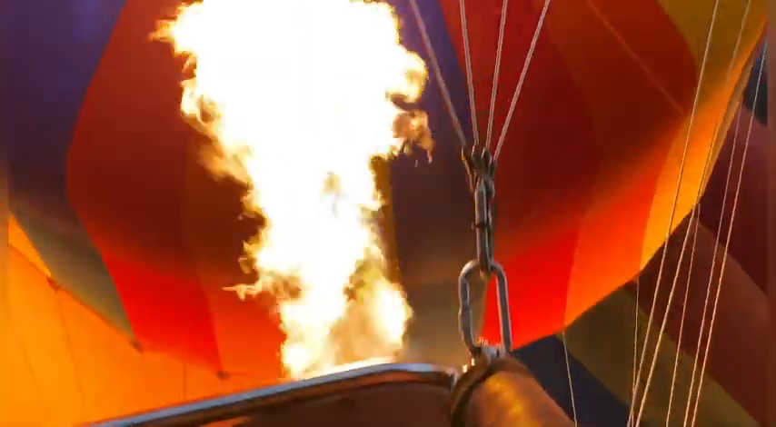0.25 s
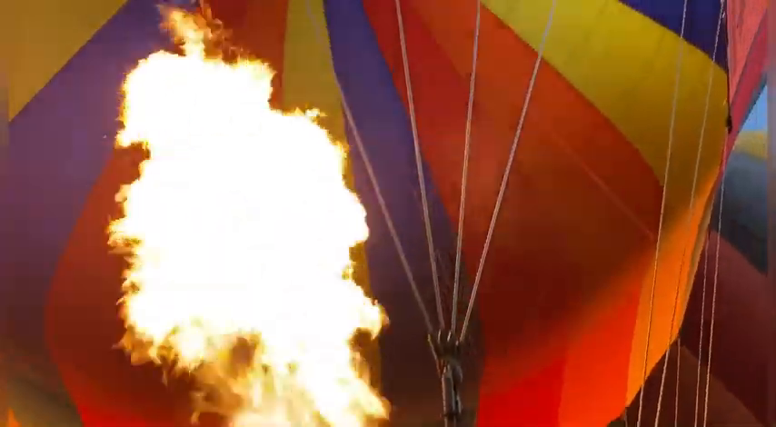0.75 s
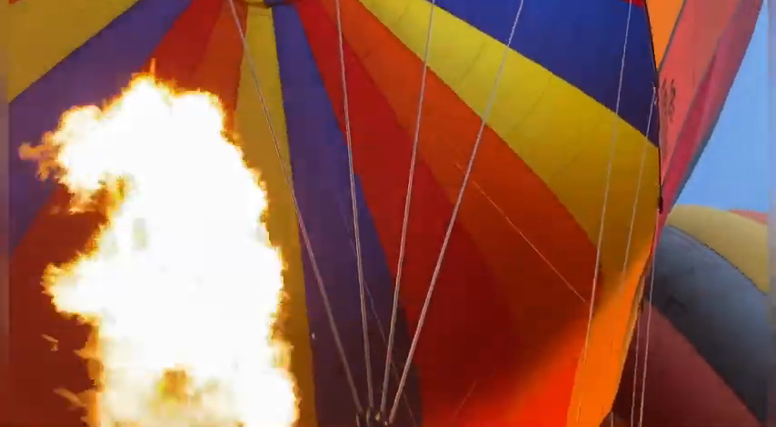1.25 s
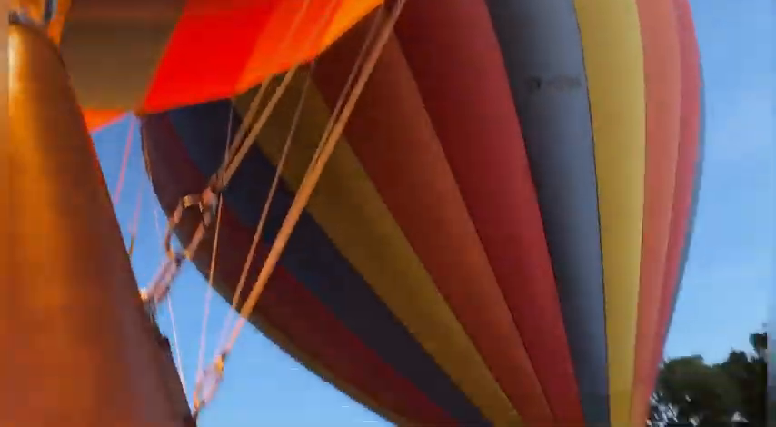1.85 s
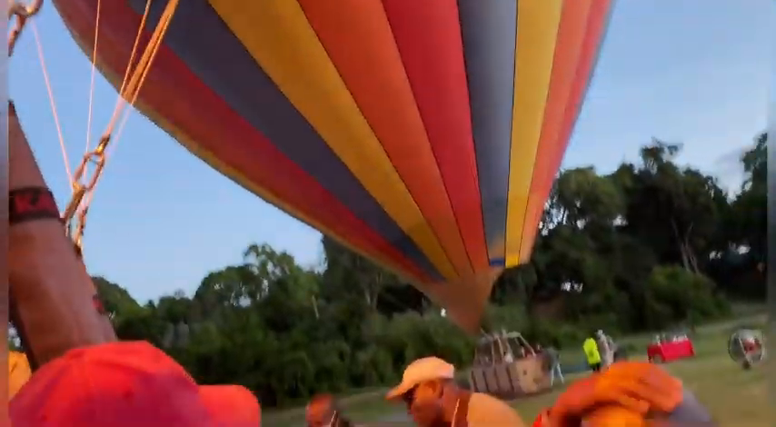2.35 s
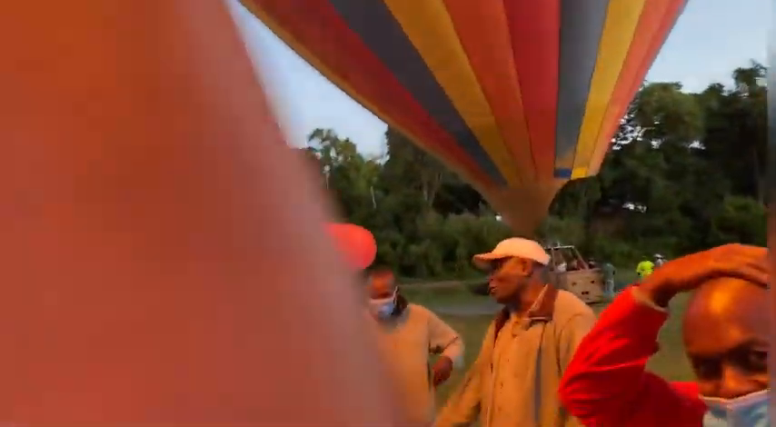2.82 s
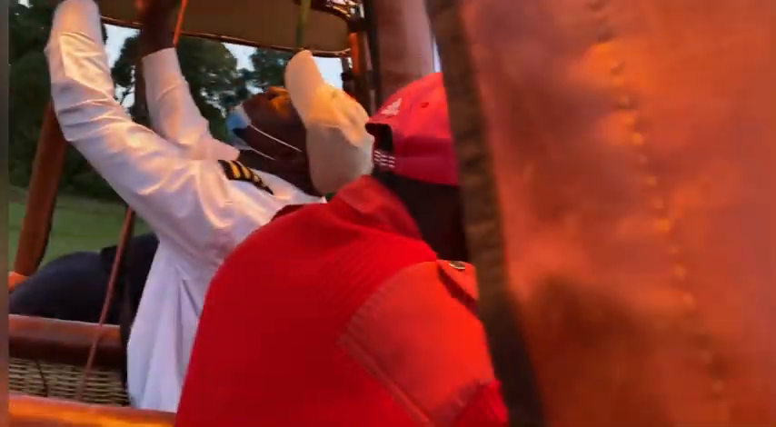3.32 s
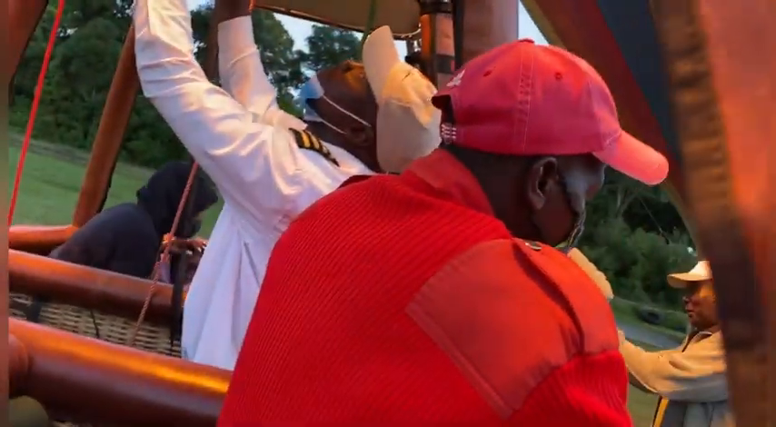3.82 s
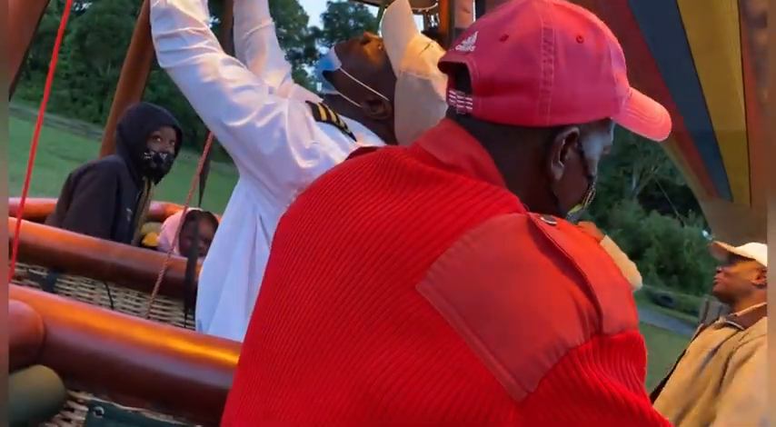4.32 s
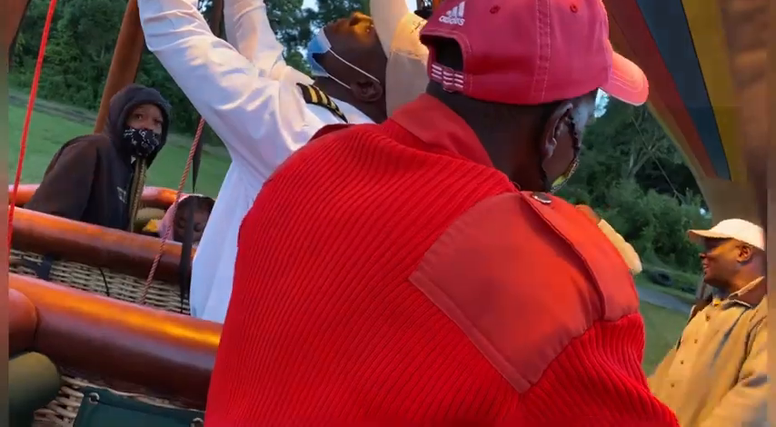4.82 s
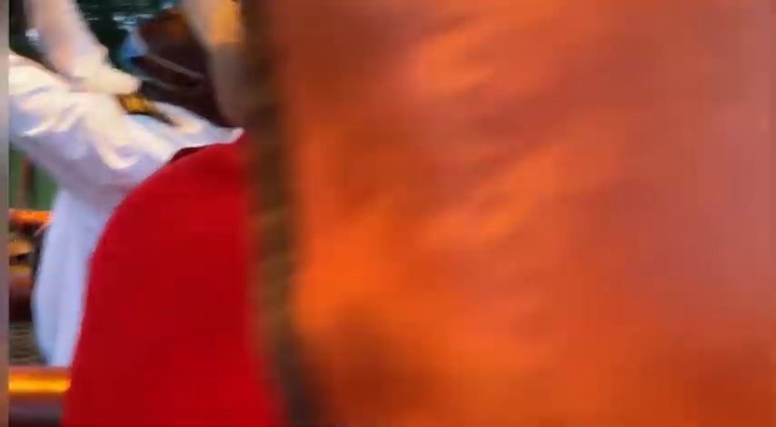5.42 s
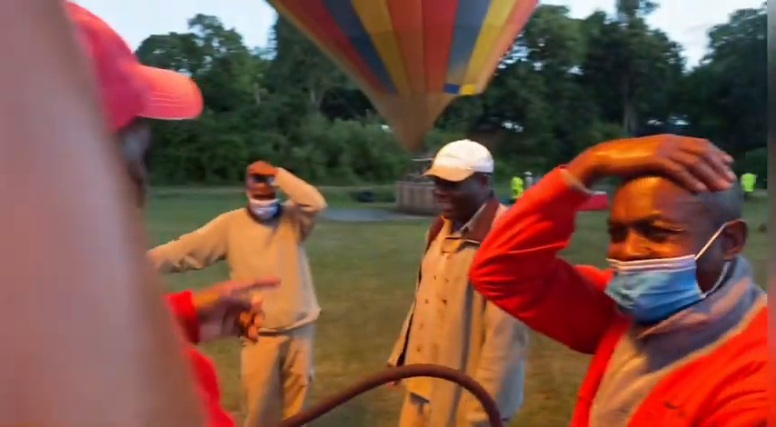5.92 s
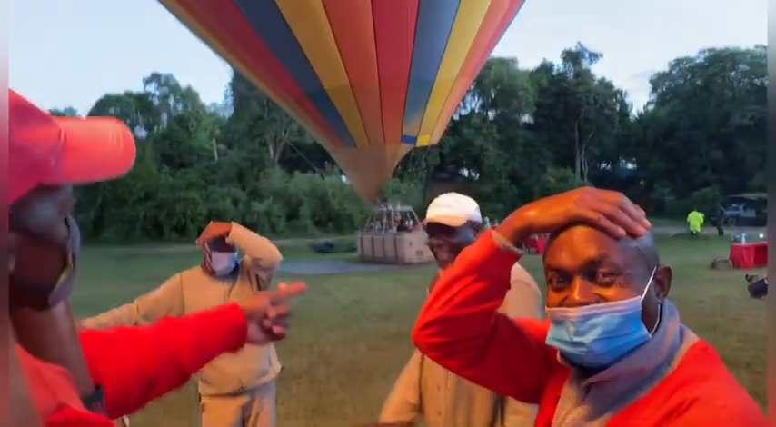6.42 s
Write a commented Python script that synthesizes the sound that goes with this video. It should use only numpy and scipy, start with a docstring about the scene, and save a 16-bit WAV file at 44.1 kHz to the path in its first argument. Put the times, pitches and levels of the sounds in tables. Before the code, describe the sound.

Unbroken, loud burner roar close by outdoors: fluttering low rumble, rushing mid-range flame and sputtering jet hiss that dulls and brightens with camera movement.

```python
"""Balloon burner overhead

A hot-air balloon's propane burner fires without a break: shaped noises make the flame's rumble and roar
and the hiss of the gas jets; short low pulses make the low swells of the rumble.
A hand-held camera looks up at the flame, drops to face the field, turns in to the basket and back out.
As it turns, the treble falls in and out of its shadow and a close echo sweeps notches through the roar."""
import sys
import numpy as np
from scipy import signal
from scipy.fft import rfft, irfft, next_fast_len
from scipy.io import wavfile
from scipy.ndimage import uniform_filter1d, map_coordinates

SR = 44100
rng = np.random.default_rng(int(sys.argv[2]) if len(sys.argv) > 2 else 0)


def inscribe(sig):
    """Save sig as 16-bit PCM at rate SR to the path in sys.argv[1].

    A 1-D sig is mono; a 2-D sig holds one channel per row.
    Samples are clipped to [-1, 1] before scaling.
    """
    pcm = np.round(np.clip(np.atleast_2d(sig).T, -1, 1) * 32767)
    wavfile.write(sys.argv[1], SR, pcm.astype(np.int16))


N = 293706

# short-time spectra: window and hop [samples], bin frequencies [Hz], frame times [s]
SIZE, HOP = 1024, 256
HZ = np.fft.rfftfreq(SIZE, 1 / SR)[:, None]
TIMES = np.arange(N // HOP + 2) * HOP / SR

# strength of the flame, before the trim of the rumble or the roar: (time [s], level [dB])
FLAME_LEVEL = [(0, -19), (1.1, -19), (2.0, -18.5), (2.6, -18.0), (3.45, -19.5), (3.75, -18.5), (4.2, -18.9),
               (5.3, -19.5), (5.9, -19.5), (6.66, -20)]


def amp(db):
    """Level: twenty decibels are a factor of ten in amplitude."""
    return 10 ** (np.asarray(db) / 20)


def unit(x):
    """Normalization: equal mean power, with rms 1."""
    return x / np.sqrt(np.mean(x ** 2) + 1e-20)


def along(points, hz=HZ):
    """Logarithmic frequency scale: interpolates (frequency [Hz], value) points on it."""
    f, v = np.transpose(points)
    return np.interp(np.log(hz + 1), np.log(f + 1), v)


def curves(rows, times):
    """Linear interpolation in time of each column after the first."""
    s, *columns = np.transpose(rows)
    return [np.interp(times, s, column) for column in columns]


def wobble(rate, times):
    """Random modulation: a smooth curve through normal random knots, rate of them a second."""
    knots = rng.standard_normal(int(times[-1] * rate) + 4)
    return map_coordinates(knots, [times * rate])


def filtered(x, response):
    """Linear filtering: the spectrum of x times a response of frequency."""
    m = next_fast_len(N + SR // 4)
    spectrum = rfft(x, m) * response(np.fft.rfftfreq(m, 1 / SR))
    return irfft(spectrum, m)[..., :N]


def moving(x, response):
    """Time-varying filtering: short-time spectra times a response over HZ and TIMES."""
    frames = signal.stft(x, nperseg=SIZE, noverlap=SIZE - HOP)[2]
    return signal.istft(frames * response, nperseg=SIZE, noverlap=SIZE - HOP)[1][:, :N]


def noise(spectrum, channels):
    """Turbulent sound as independent random noises of one spectrum and rms 1."""
    white = rng.standard_normal((channels, N))
    return unit(filtered(white, lambda hz: amp(along(spectrum, hz))))


def at_ports(spectrum):
    """Coherence: one noise in phase at both ports and one in opposite phase set their likeness."""
    # (frequency [Hz], left-right likeness [0-1])
    coherence = [(60, .97), (450, .98)]

    def angle(hz):
        return np.arccos(np.clip(along(coherence, hz), 0, 1)) / 2

    shared, opposed = noise(spectrum, channels=2)
    mid = filtered(shared, lambda hz: np.cos(angle(hz)))
    side = filtered(opposed, lambda hz: np.sin(angle(hz)))
    return np.array([mid + side, mid - side])


def panned(left_db):
    """Interaural level difference: gains of the two ports that are left_db apart."""
    return np.array([amp(left_db / 2), amp(-left_db / 2)])


def swing(middle_s, length_s):
    """Smooth motion: a half sine eases a hand movement from 0 to 1 over TIMES."""
    return .5 + .5 * np.sin(np.pi * np.clip((TIMES - middle_s) / length_s, -.5, .5))


def camera(flame_db=5, basket_db=7):
    """Acoustic shadow: facing (lowered, inward [0-1]) sets how far the jets stand out of it [dB]."""
    # swings round: (time of mid-swing [s], length [s], turn [+1 into the basket, -1 back out])
    turns = [(3.0, 0.96, 1), (5.48, 0.77, -1)]
    lowered = swing(1.61, 0.98)
    inward = sum(np.sign(turn) * swing(s, length) for s, length, turn in turns)
    # the jets slip into the shadow more gradually than the camera drops
    shaded = swing(1.45, 2.1)
    exposed_db = flame_db * (1 - shaded) + basket_db * inward
    return lowered, inward, exposed_db


def frame_echoes(position, strength, count=10, typical_ms=1.9, swing_ms=.45, above_hz=2400):
    """Scattering: frame and rigging echo short waves, with delays that slide as the camera turns and sways."""
    position = position + .5 * wobble(3.5, TIMES)  # the hand's unsteadiness
    total = np.zeros((2, len(HZ), len(TIMES)), complex)
    for k, (distance, direction) in enumerate(rng.uniform(-0.997, 1, (count, 2))):
        slide_ms = swing_ms * np.sin(np.pi / 2 * direction) * position
        delay_ms = typical_ms * (1 + distance / 2) + slide_ms
        total[k % 2] += np.exp(-2j * np.pi * HZ * delay_ms / 1000)
    short_waves = HZ ** 2 / (HZ ** 2 + above_hz ** 2)
    return strength * total * short_waves


def rumble(steady_s=.14, trim_db=-0.48, left_db=1.64, billow_db=0.75, billow_rate=16, deep_hz=70):
    """Turbulent combustion: large eddies, kept even in power by the steady gas feed, billow quickly."""
    # relative spectrum: (frequency [Hz], density [dB per Hz])
    eddy_spectrum = [(18, -38), (30, -35), (42, -8.5), (60, -2), (80, -0.5), (115, -2), (160, -6),
                     (210, -5.5), (280, -13), (450, -24), (900, -84)]
    # gain of the deepest rumble: (time [s], gain [dB])
    deep_gain = [(0, 1.5), (1.1, -2.5), (1.8, -4), (2.5, -3), (3.3, -1.5), (4.2, 1), (5, 1.8), (5.45, 3.5),
                 (6.2, -0.5)]
    t = np.arange(N) / SR
    eddies = at_ports(eddy_spectrum)
    power = np.abs(uniform_filter1d(np.mean(eddies ** 2, axis=0), int(steady_s * SR)))
    flame_db, = curves(FLAME_LEVEL, t)
    deep_db, = curves(deep_gain, t)
    level = amp(flame_db + trim_db + billow_db * wobble(billow_rate, t))
    even = eddies / np.sqrt(power + 1e-6) * level * panned(left_db)[:, None]
    deep = filtered(even, lambda hz: 1 / (1 + (hz / deep_hz) ** 6))
    return even + (amp(deep_db) - 1) * deep


def patches(rms_db=1.05, width_hz=350, length_s=.1):
    """Turbulent colour: random patches of gain [dB] over HZ and TIMES."""
    field = rng.standard_normal((len(HZ), len(TIMES)))
    field = uniform_filter1d(field, int(width_hz * SIZE / SR), axis=0)
    field = uniform_filter1d(field, int(length_s * SR / HOP), axis=1)
    return rms_db * unit(field)


def roar(flicker_db=0.5, flicker_rate=20, trim_db=-5.0, likeness_power=.75):
    """Interference: the small eddies' noise meets its echoes off close surfaces as the camera turns."""
    # relative spectrum: (frequency [Hz], density [dB per Hz])
    eddy_spectrum = [(130, -7.5), (350, 1), (520, -3), (700, -6), (950, -6), (1400, -14), (1900, -17.5),
                     (2600, -20), (3300, -18.5), (4200, -20), (5200, -21), (6200, -23.5), (6900, -32),
                     (9000, -90)]
    # the ports by facing, likeness before likeness_power:
    # (frequency [Hz], left gain [dB], right gain [dB], left lead [cycles], likeness [0-1])
    facing_flame = [(350.0, 0.7, -0.4, 0.05, 0.96), (750.0, 4.0, 1.7, 0.01, 0.85),
                    (950.0, 0.2, -2.6, 0.07, 0.88), (1150.0, 2.0, -3.0, 0.04, 0.75),
                    (1450.0, 4.8, 2.8, 0.03, 0.75), (1950.0, 5.3, 7.2, 0.01, 0.72),
                    (2600.0, 4.6, 5.2, 0.1, 0.55), (3600.0, 1.6, 0.7, 0.22, 0.42),
                    (3900.0, 3.9, 2.4, 0.41, 0.12), (5200.0, 5.2, 1.7, 0.88, 0.4),
                    (5800.0, 3.2, 0.0, 0.94, 0.37), (6150.0, 4.9, 2.7, 1.05, 0.4)]
    facing_field = [(350, 1.3, -1.0, 0.13, 0.95), (420, 2.6, 0.2, 0.17, 0.92), (500, 3.2, -0.2, 0.23, 0.92),
                    (620, 2.6, -4.8, 0.17, 0.7), (720, 4.0, -2.8, 0.18, 0.8), (820, 2.6, -2.5, 0.25, 0.9),
                    (930, 0.4, -3.0, 0.33, 0.84), (1070, -0.2, -2.5, 0.45, 0.75),
                    (1160, -0.6, -4.2, 0.5, 0.63), (1330, 1.8, -1.2, 0.33, 0.62),
                    (1500, 1.8, 0.4, 0.38, 0.66), (1680, 3.3, 3.6, 0.48, 0.84),
                    (1830, 1.2, 3.4, 0.56, 0.75), (2020, 2.2, 2.4, 0.91, 0.7), (2250, 4.6, 3.7, 1.06, 0.6),
                    (2480, 3.5, 2.8, 1.25, 0.35), (2660, 2.8, 2.2, 1.55, 0.12), (2850, 1.8, 1.4, 1.9, 0.45),
                    (3050, 0.6, -0.3, 2.03, 0.53), (3450, -0.4, -1.2, 1.97, 0.6),
                    (3800, 1.2, 1.0, 1.89, 0.4), (4650, 0.4, 0.2, 2.29, 0.1), (4800, 1.8, 1.2, 2.25, 0.22),
                    (5550, 0.8, 1.3, 2.73, 0.19), (5850, 2.5, 2.5, 2.95, 0.45)]
    facing_basket = [(350, 0.2, -0.2, 0.02, 0.98), (520, 4.8, 1.8, 0.12, 0.93), (600, 3.4, -2.2, 0.17, 0.6),
                     (650, 1.2, -2.5, -0.16, 0.15), (750, -2.4, -0.3, -0.05, 0.72),
                     (1000, -0.5, -0.6, 0.12, 0.7), (1300, 1.6, -0.5, 0.26, 0.66),
                     (1550, 0.5, -4.0, 0.45, 0.45), (1930, 6.3, 6.3, 0.98, 0.96),
                     (2070, 1.4, 1.7, 1.0, 0.94), (2330, 4.3, 5.9, 1.31, 0.75),
                     (2750, 7.4, 4.0, 1.26, 0.46), (2900, 3.2, 1.2, 1.23, 0.41),
                     (3300, 5.4, 1.6, 1.42, 0.42), (3750, 0.2, -0.6, 1.98, 0.57),
                     (4250, 3.4, 1.0, 2.09, 0.5), (4550, 1.8, -0.4, 2.05, 0.49),
                     (5050, 5.0, 2.7, 2.65, 0.47), (6000, 7.4, 2.4, 3.2, 0.04),
                     (6150, 5.1, 1.0, 3.03, 0.33)]
    # extra path by way of the nearest surface: (time [s], echo delay [ms])
    echo_path = [(1.2, 1.3), (1.6, 1.52), (1.9, 1.65), (2.2, 1.74), (2.55, 1.72), (2.85, 1.57), (3.1, 1.41),
                 (3.35, 1.3), (3.7, 1.25), (4.5, 1.24), (5, 1.26), (5.3, 1.37), (5.6, 1.53), (6, 1.61)]
    # hollows and ridges of the close echo, at full strength with the camera lowered:
    # (place [multiples of 1 / delay], half-width [the same], gain [dB])
    echo_comb = [(1.94, .17, -1.5), (2.6, .18, 1.1), (3.05, .17, -1.4), (3.85, .25, 1.2), (4.6, .22, -1.1)]
    # close passes by a padded upright: (time [s], half-length [s])
    upright_passes = [(1.82, .17), (3.25, .24), (5.33, .18)]
    # deeper hollows of its strong echo: (place [multiples of 1 / delay], half-width [the same], gain [dB])
    upright_comb = [(1.94, .15, -3.6), (3.07, .16, -4.4), (4.25, .27, -3.6)]

    lowered, inward, _ = camera()
    flame_db, = curves(FLAME_LEVEL, TIMES)
    echo_ms, = curves(echo_path, TIMES)
    # longer paths slide the patterns down in pitch; field and basket tables hold at 1.72 and 1.24 ms
    views = [(1 - lowered, facing_flame, HZ),
             (lowered * (1 - inward), facing_field, HZ * echo_ms / 1.72),
             (lowered * inward, facing_basket, HZ * echo_ms / 1.24)]
    ports_db, common = 0, 0
    for share, table, hz in views:
        columns = (along(np.array(table)[:, [0, k]], hz) for k in range(1, len(table[0])))
        left_db, right_db, lead, alike = columns
        ports_db = ports_db + share * np.array([left_db, right_db])
        likeness = np.clip(alike, 0, 1) ** likeness_power
        common = common + share * likeness * np.exp(-2j * np.pi * lead)

    multiple = HZ * echo_ms / 1000

    def comb(table):
        return sum(db * np.exp(-((multiple - place) / width) ** 2) for place, width, db in table)

    near_upright = sum(np.exp(-((TIMES - s) / length) ** 2) for s, length in upright_passes)
    comb_db = lowered * comb(echo_comb) + near_upright * comb(upright_comb)
    unrest_db = flicker_db * wobble(flicker_rate, TIMES) + patches()
    level = amp(flame_db + trim_db + ports_db + comb_db + unrest_db)
    left, right = level * (1 + frame_echoes(lowered + inward, strength=.18))
    # the right port hears part of what the left one hears, shifted in phase; the rest is scattered sound
    shared, scattered = noise(eddy_spectrum, channels=2)
    apart = np.sqrt(np.abs(1 - np.abs(common) ** 2))
    sources = np.array([shared, shared, scattered])
    parts = moving(sources, np.array([left, right * common, right * apart]))
    return np.array([parts[0], parts[1] + parts[2]])


def hiss(level_db=-32, width_db=-19, lag_ms=.2475, in_phase_hz=7030):
    """Jet noise: gas leaves the nozzles in a bright, sputtering hiss whose treble is later on the left."""
    # relative spectrum: (frequency [Hz], density [dB per Hz])
    jet_spectrum = [(4000, -60), (5700, -12), (6600, -1.6), (7300, -0.1), (8500, -0.3), (10000, -1.1),
                    (11500, -0.7), (13000, -0.0), (15500, 0.0)]
    t = np.arange(N) / SR
    lowered, inward, exposed_db = camera()
    drift_db = .5 * wobble(7, t)
    flutter_db = .56 * wobble(18, t)
    sputter_db = .3 * wobble(130, t)
    # the nozzles beam a band around 7260 Hz at a camera that looks up
    beam_db = 3 * (1 - lowered) * np.exp(-((HZ - 7260) / 430) ** 2)
    ripples = frame_echoes(lowered + inward, strength=.22)[0]
    jet = noise(jet_spectrum, channels=1) * amp(level_db + drift_db + flutter_db + sputter_db)
    jet = moving(jet, amp(exposed_db + beam_db) * (1 + ripples))[0]

    def lag(hz):
        return np.exp(-2j * np.pi * np.maximum(hz - in_phase_hz, 0) * lag_ms / 1000)

    # a weak independent hiss, opposite in sign at the two ports, widens the stereo
    spread = moving(noise(jet_spectrum, channels=1), amp(level_db + width_db + exposed_db))[0]
    return np.array([filtered(jet, lag) + spread, jet - spread])


def low_swells(width_s=0.0077):
    """Low swells: the rumble grows briefly louder at a few moments, each a low pulse under a Gaussian envelope."""
    # (time [s], peak level [dB], frequency [Hz])
    swells = [(0.108, -7.5, 120), (3.695, -10, 109), (5.23, -13, 70)]
    t = np.arange(N) / SR
    total = np.zeros(N)
    for s, db, hz in swells:
        envelope = np.exp(-((t - s) / width_s) ** 2)
        total -= amp(db) * envelope * np.cos(2 * np.pi * hz * (t - s))
    return total


def scene():
    """Superposition: the burner's rumble, roar, hiss and low swells add."""
    return rumble() + roar() + hiss() + low_swells()


def record(dry, top_hz=15750):
    """Band limiting: the camera keeps nothing above top_hz."""
    return filtered(dry, lambda hz: hz < top_hz)


dry = scene()
out = record(dry)
inscribe(out)
```